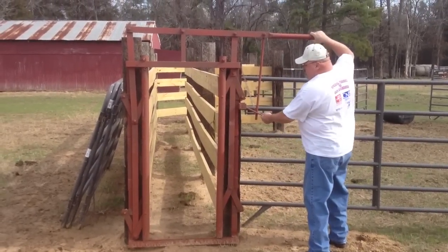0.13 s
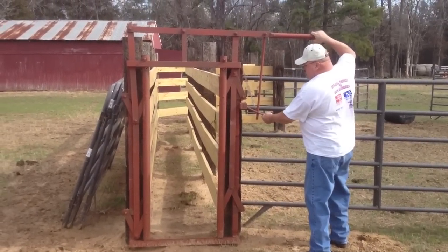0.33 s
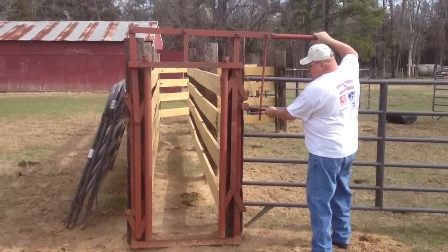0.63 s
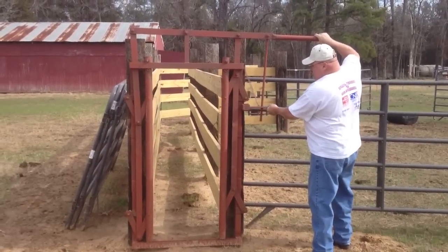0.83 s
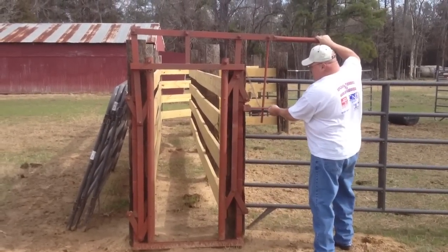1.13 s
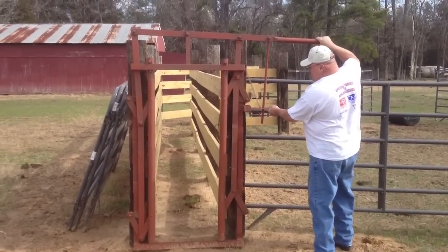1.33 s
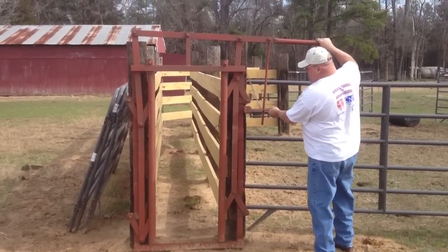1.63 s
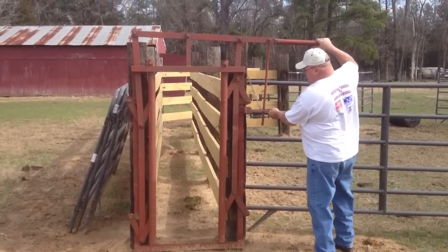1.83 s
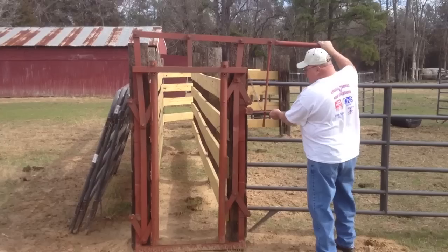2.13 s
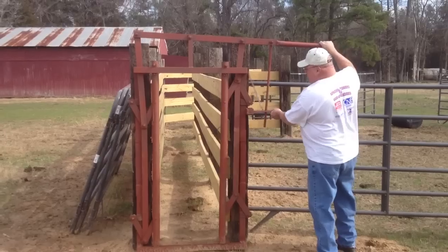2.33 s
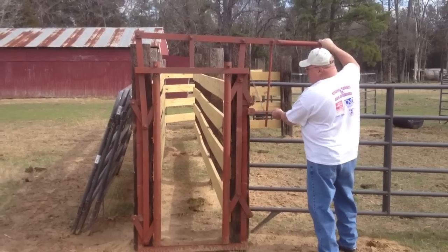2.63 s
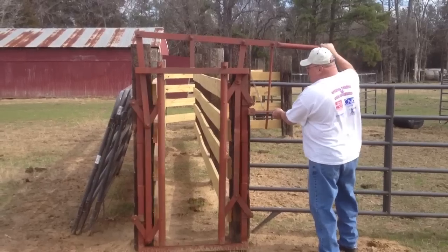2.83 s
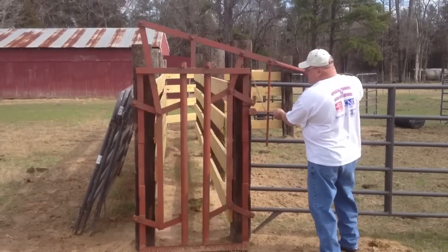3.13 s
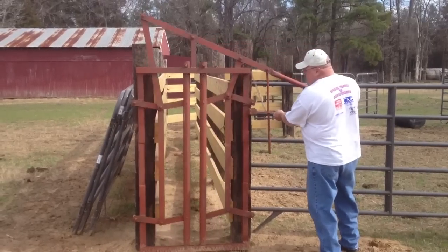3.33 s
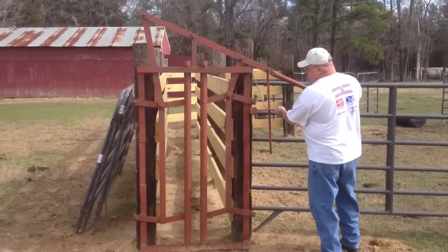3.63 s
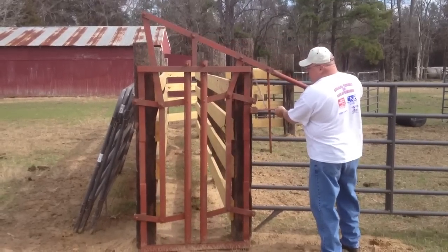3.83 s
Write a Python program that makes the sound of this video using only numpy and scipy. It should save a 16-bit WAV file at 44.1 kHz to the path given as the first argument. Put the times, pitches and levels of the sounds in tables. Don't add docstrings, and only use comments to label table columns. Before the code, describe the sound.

Metal gate a few metres from a small microphone outdoors: light ticks and dry squeaks, two hissy lever scrapes, then a gritty slide and cluster of clanks closing it, under low wind rumble strongest at first.

```python
import sys
import numpy as np
from scipy import signal
from scipy.fft import rfft, irfft
from scipy.io import wavfile
from scipy.ndimage import uniform_filter1d

SR = 44100
rng = np.random.default_rng(int(sys.argv[2]) if len(sys.argv) > 2 else 0)


def unload_audio(sound):
    columns = np.transpose(np.atleast_2d(sound))
    steps = np.round(np.clip(columns, -1, 1) * 32767)
    wavfile.write(sys.argv[1], SR, steps.astype(np.int16))


def attenuation_scalar(level_db):
    decades = np.asarray(level_db, float) / 20
    return 10 ** decades


N = 176400

# f/Hz, level/dB
STEEL_CONTACT = [(480, -1.5), (1000, 15), (2200, 4.5), (3000, -4), (4200, 0), (8000, -7.5), (9400, -10.5),
                 (15000, -3)]


def unit(x):
    return x / np.sqrt(np.mean(x ** 2) + 1e-20)


def read(table, at):
    table = np.array(table)
    return np.interp(np.log(np.maximum(at, 1)), np.log(table[:, 0]), table[:, 1])


def focus(hz, centre):
    return np.maximum(-5 * (np.log2(hz / 1000) - centre) ** 2, -24)


def colour(x, table, tilt_db=0., centre=None):
    hz = np.maximum(np.fft.rfftfreq(len(x), 1 / SR), 1)
    db = read(table, hz) + tilt_db * np.log2(np.clip(hz, 500, SR) / 2000)
    if centre is not None:
        db = db + focus(hz, centre)
    return irfft(rfft(x) * attenuation_scalar(db), len(x))


def ring(x, hz, width):
    r = np.exp(-np.pi * width / SR)
    gain = (1 - r * r) / 2
    return signal.lfilter([gain, 0, -gain], [1, -2 * r * np.cos(2 * np.pi * hz / SR), r * r], x)


def walk(rate, size=N):
    hold = max(int(SR / rate), 1)
    steps = np.repeat(rng.standard_normal(size // hold + 1), hold)[:size]
    return 1.3 * uniform_filter1d(uniform_filter1d(steps, hold), hold)


def distant_air():
    # f/Hz, level/dB
    air_colour = [(410, -33.5), (700, -1.5), (1200, -7.5), (2200, -10.5), (2510, -14), (8000, -18.5),
                  (9580, -25.5), (14500, -17), (15200, -40)]
    hiss = colour(rng.standard_normal(N), [(300, -72.0)] + list(air_colour))
    return unit(hiss) * attenuation_scalar(-68.5 + 1.0 * walk(3.8))


def wind(t):
    # t/s, level/dB
    gusts = [(0, -6), (.07, -17.5), (.1, -19.5), (.55, -23.5), (.8, -23), (.96, -16.5), (.99, -29.5),
             (1.03, -21), (1.35, -24), (1.52, -25.5), (1.9, -30), (2.22, -26.5), (2.7, -32.5), (2.9, -30),
             (3.25, -36.5), (3.44, -32), (3.58, -40), (4, -24.5)]
    # f/Hz, level/dB per Hz
    wind_colour = [(25, -42), (55, -30), (110, -5), (145, 1.5), (230, -3), (540, -27.5), (1100, -51.5),
                   (3500, -92.5)]
    # t/s, level/dB, extra reach into the upper bands per octave
    buffets = [(0.031, 2.5, 0.13), (0.119, -5, 0.34), (0.167, -0.5, 0.98), (0.26, -18, 0.55),
               (0.322, -13.5, 0.87), (0.385, -6.5, 0.86), (0.468, -11.5, 0.26), (0.603, -19.5, 0.14),
               (0.604, -13, 0.15), (0.685, -22.5, 0.3), (0.795, -12, 0.32), (0.914, -18.5, 0.16),
               (0.951, -16.5, 0.19), (1.002, -7, 0.13), (1.162, -24, 0.3), (1.275, -14, 0.98),
               (1.37, -19.5, 0.4), (1.398, -13, 0.8), (1.472, -13.5, 0.4), (1.473, -10.5, 0.88),
               (1.514, -11.5, 0.84), (1.588, -16.5, 0.29), (1.651, -16, 0.29), (1.724, -21.5, 0.3),
               (1.793, -14.5, 0.47), (1.875, -29, 0.52), (1.947, -29, 0.4), (2.12, -17, 0.4),
               (2.204, -11, 0.52), (2.373, -28, 0.13), (2.447, -19, 0.15), (2.505, -25.5, 0.4),
               (2.548, -17.5, 0.37), (2.604, -21.5, 0.13), (2.722, -38.5, 0.4), (2.763, -24, 1),
               (2.861, -27, 0.4), (3.017, -44.5, 0.52), (3.064, -19, 0.5), (3.124, -9, 0.45),
               (3.195, -20.5, 0.58), (3.262, -34.5, 0.43), (3.381, -28.5, 0.29), (3.422, -18.5, 0.4),
               (3.515, -34, 0.53), (3.668, -22, 0.4), (3.791, -32.5, 0.22), (3.936, -21, 0.62)]
    rise_s, fall_s = 0.004, 0.017

    gust = np.interp(t, *np.array(gusts).T)
    calm = attenuation_scalar(-gust - 24)
    kick, bright = 1e-9 + 0 * t, 0 * t
    for start, db, reach in buffets:
        u = np.clip(t - start, 0, None)
        puff = attenuation_scalar(db + 20) * calm * (1 - np.exp(-u / rise_s)) * np.exp(-u / fall_s)
        kick = kick + puff
        bright = bright + reach * puff

    swell, crackle = walk(21.79), walk(170)
    f = np.maximum(np.fft.rfftfreq(N, 1 / SR), 1)
    out = 0
    for hz in 25 * 2 ** np.arange(0, 7.4, .5):
        shape = np.exp(-(np.log2(f / hz) / .35) ** 2) * attenuation_scalar(read(wind_colour, f))
        band = irfft(rfft(rng.standard_normal(N)) * shape, N)
        even = band * np.mean(np.abs(band)) / uniform_filter1d(np.abs(band), size=SR // 4)
        up = np.log2(hz / 160)
        db = -1.36 * swell + 2.5 * walk(24.757)
        db = db + 0.27 * up * (gust + 25)
        db = db + 1.58 * max(up, 0) * crackle
        out = out + even * attenuation_scalar(db) * (1 + np.clip(0.85 * kick + bright * up, 0, None))
    steady = out / uniform_filter1d(np.abs(out), size=SR // 6)
    return unit(steady) * attenuation_scalar(gust)


def pops():
    # t/s, peak level/dB
    snaps = [(0.056, -35), (.118, -37), (.155, -39), (0.196, -29), (0.256, -43), (0.31, -44),
             (0.347, -43.5), (.407, -37), (0.411, -32), (0.666, -39.5), (.81, -41.5), (.932, -34.5),
             (0.954, -39.5), (1.168, -39), (1.284, -38.5), (1.289, -44), (1.365, -41.5), (1.395, -43.5),
             (1.411, -47.5), (1.497, -41), (1.962, -44), (3.938, -40)]
    out = np.zeros(N)
    at, db = np.array(snaps).T
    out[(at * SR).astype(int)] = attenuation_scalar(db + 1)
    shape = signal.unit_impulse(SR // 50)
    for hz in (600, 600, 1200):
        shape = ring(shape, hz, 1.4 * hz)
    return np.convolve(out, shape / np.max(np.abs(shape)))[:N]


def squeaks_and_calls(t):
    # t/s, length/s, start f/Hz, end f/Hz, level/dB
    gliding_tones = [(.439, 0.03, 2620, 2380, -41), (0.444, 0.0092, 2100, 2100, -36),
                     (0.563, 0.035, 2235, 2200, -41), (0.584, 0.036, 2360, 2350, -44.5),
                     (0.624, 0.038, 2230, 2364, -55), (0.699, 0.033, 2640, 2484, -41),
                     (0.721, 0.027, 2440, 2340, -52.5), (1.689, 0.11, 2950, 3114, -63.5),
                     (2.129, 0.016, 2470, 2470, -33), (3.22, 0.099, 2940, 3130, -57),
                     (3.86, 0.14, 2760, 2690, -66), (3.932, 0.12, 2770, 2740, -67),
                     (2.904, 0.14, 1900, 1920, -44), (3.052, 0.058, 1960, 1900, -45),
                     (0.533, 0.031, 1900, 2040, -58.5)]
    # 2nd harmonic level/dB, 3rd level/dB, 4th level/dB
    overtones = [(-11, -21, -27), (-22, -48, -42), (1, -18, -15.5), (-21, -23, -25), (-18, -40, -34),
                 (-16, -36, -38), (-21, -32, -40), (-3.5, -12, -44), (-32, -40, -32), (-1, -18, -36),
                 (1, -16, -49), (2, -4, -33), (-20, -37, -40), (-5, -40, -42), (-26, -40, -41)]
    wobble, rough = walk(220), walk(200)
    out = 0
    for (start, length, start_hz, end_hz, db), over in zip(gliding_tones, overtones):
        u = (t - start) / length
        waver = min(1, .03 / length)
        glide = 1 - np.exp(-2.5 * np.clip(u, 0, 1))
        hz = (start_hz + (end_hz - start_hz) * glide) * (1 + 2.1 * .007 * waver ** 2 * wobble)
        phase = 2 * np.pi * np.cumsum(hz) / SR
        env = np.sin(np.pi * np.clip(u, 0, 1) ** .7) ** .7
        tone = 0
        for k, overtone_db in enumerate((0, *over)):
            tone = tone + attenuation_scalar(overtone_db) * env ** k * np.sin((k + 1) * phase)
        out = out + env * attenuation_scalar(db + 3 * waver * rough) * tone
    return out


def scrape(t, curves, modes, grit_db, hiss_db, tilt_db, flutter_db, rate, patchy_db):
    env = sum(attenuation_scalar(np.interp(t, *np.array(c).T, left=-200, right=-200)) for c in curves)
    grit = rng.standard_normal(N) * attenuation_scalar(grit_db * rng.exponential(size=N))
    grit = unit(grit) * attenuation_scalar(flutter_db * walk(rate))
    tones = 0
    for hz, width, db in modes:
        tones = tones + attenuation_scalar(db + patchy_db * walk(28.26)) * ring(grit, hz, width)
    hiss = unit(colour(grit, STEEL_CONTACT, tilt_db))
    return uniform_filter1d(env, size=200) * unit(unit(tones) + attenuation_scalar(hiss_db) * hiss)


def rod_scrape(t):
    # t/s, level/dB
    strokes = [
        [(1.02, -72.5), (1.05, -58.5), (1.15, -53), (1.29, -53.5), (1.305, -59.5), (1.36, -76.5),
         (1.375, -59.5), (1.4, -83)],
        [(1.59, -75), (1.61, -92), (1.94, -67), (1.96, -67.5), (2.09, -60), (2.13, -49), (2.19, -60.5),
         (2.26, -60.5), (2.29, -74.5)],
    ]
    # f/Hz, width/Hz, level/dB
    rod_modes = [(2080, 86, 7), (2850, 75, 0.5), (3400, 60, -4.5), (4010, 100, 3.5), (4900, 36, -1.5),
                 (5260, 45, 3), (6550, 40, -4.5), (7400, 110, -11.5), (7950, 64, 1.5), (8420, 85, -2.5),
                 (9900, 110, -25), (10920, 150, -0.5), (11700, 60, -3.5), (15000, 370, -20.5)]
    return scrape(t, strokes, rod_modes, grit_db=1.2, hiss_db=1.2, tilt_db=-.3,
                  flutter_db=1.2, rate=110, patchy_db=1.2)


def door_slide(t):
    # t/s, level/dB
    slide_level = [(2.51, -58), (2.68, -59.5), (2.8, -49), (2.88, -49.5), (3.0, -43), (3.05, -42.5),
                   (3.13, -39), (3.22, -42), (3.295, -55.5)]
    # f/Hz, width/Hz, level/dB
    door_modes = [(725, 90, 9.5), (950, 26, 9.5), (1267, 170, 11), (1660, 120, 8), (1858, 120, 14.5),
                  (2220, 26, -2), (2440, 87, -2), (3160, 49, -10), (3475, 35, 7.5), (3860, 150, 4.5),
                  (4600, 34, -15), (5300, 26, -13), (5440, 55, -29), (10700, 460, -17.5)]
    return scrape(t, [slide_level], door_modes, grit_db=2.4, hiss_db=-7, tilt_db=-4,
                  flutter_db=1.1, rate=150, patchy_db=4.5)


def peak(x):
    return x / (4 * np.sqrt(np.max(uniform_filter1d(x ** 2, size=200))))


def knocks():
    # t/s, peak level/dB, centre/octaves above 1 kHz, rattle/s
    hits = [(0.402, -41, 1.1, .003), (0.4412, -36.5, 1.7, 0.014), (.566, -41.5, 2.34, 0.015),
            (1.09, -25.5, 1, 0.018), (1.9579, -52.5, 3, 0.017), (2.0986, -51.5, 1.7, 0.0087),
            (2.119, -40.5, 2.5, 0.042), (2.129, -27, 1.04, 0.0131), (2.1698, -59.5, 6, 0.049),
            (2.2367, -42.5, 1.83, 0.012), (2.5173, -47.5, 1.45, 0.0054), (2.5678, -33.5, 3, 0.0068),
            (2.596, -32.5, 0.5, 0.017), (2.6497, -52, 2.5, 0.0087), (2.6932, -44.5, 1.9, 0.023),
            (2.702, -32, 2, 0.017), (2.7463, -36, 2.5, 0.025), (2.7716, -20.5, 1.47, 0.014),
            (2.837, -42, 5.5, 0.0048), (3.0676, -37, 3, 0.016), (3.0868, -35, 1.9, 0.052),
            (3.1115, -27.5, 1.76, 0.03), (3.2957, -22, 1.67, 0.015), (3.306, -26, 0.5, 0.023),
            (3.358, -39, 0.1, .012), (3.518, -53.5, 0.66, 0.012), (3.686, -54, -0.7, 0.0051),
            (2.908, -37.5, -3.1, 0.018), (2.958, -55, -8, 0.0046), (3.3984, -41.5, 0.5, 0.012),
            (3.4328, -43.5, 0.66, 0.0047), (3.7817, -42.5, 4, 0.063)]
    # f/Hz, level/dB, ring length/s (60 dB down after about a third of it)
    frame_modes = [(690, 20.5, 0.078), (919, 10, 0.15), (1070, -0.5, 0.19), (1252, 9, 0.077),
                   (1680, 10.5, 0.022), (1900, -11.5, 0.33), (2350, -23.5, 0.12), (2427, 3.5, 0.024),
                   (3130, -9.5, 0.039), (3802, -8, 0.07), (4370, -9.5, 0.029), (5400, -16, 0.06),
                   (6800, -24, .06), (8300, -32, .06)]
    n = SR // 4
    u = np.arange(n) / SR
    out = np.zeros(N + SR)
    for start, db, centre, rattle in hits:
        first_contact = 0.62 * np.exp(-u / 0.00028)
        env = (np.exp(-u / max(rattle, 1e-3)) + first_contact) * np.minimum(u / 0.00009, 1)
        push = rng.standard_normal(n) * attenuation_scalar(2.0 * walk(500, size=n)) * env
        crack = colour(np.roll(push, shift=40), STEEL_CONTACT, 0, centre)

        modes = 0
        for hz, mode_db, ring_s in frame_modes:
            gain = attenuation_scalar(mode_db + 3 * rng.standard_normal() + focus(hz, centre))
            modes = modes + gain * np.sqrt(ring_s) * unit(ring(crack, hz, 6.2 / ring_s))

        echo = rng.standard_normal(n) * np.exp(-u / 0.056) * np.minimum(u / .015, 1)
        tail = colour(echo, STEEL_CONTACT, -2.5, centre)

        ring_db = -3 - 12 * max(centre - 2.4, 0)
        knock = attenuation_scalar(-5) * peak(crack) + attenuation_scalar(ring_db) * peak(modes) + attenuation_scalar(-20.5) * peak(tail)
        i = int(start * SR)
        out[i:i + n] += 2 * attenuation_scalar(db) * knock
    return out[:N]


def scene():
    t = np.arange(N) / SR
    weather = distant_air() + wind(t) + pops()
    gate = squeaks_and_calls(t) + door_slide(t) + rod_scrape(t) + knocks()
    return (weather + gate)[None, :]


def low_pass(x):
    return signal.sosfilt(signal.butter(12, 15390, fs=SR, output="sos"), x)


def record(dry):
    soft = np.tanh(1.2 * dry) / 1.2
    bass_cut = signal.butter(2, 45, "high", fs=SR, output="sos")
    mix = signal.sosfilt(bass_cut, soft)
    return low_pass(mix)


dry = scene()
out = record(dry)
unload_audio(out)
```